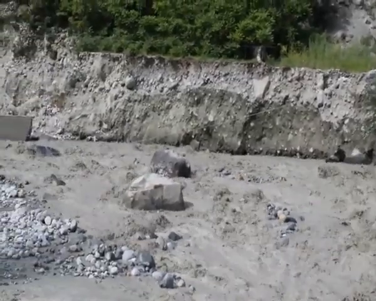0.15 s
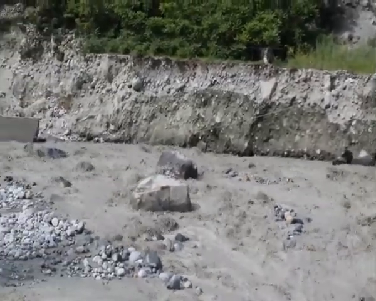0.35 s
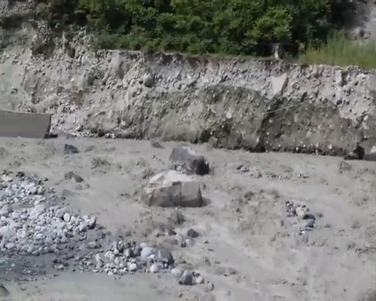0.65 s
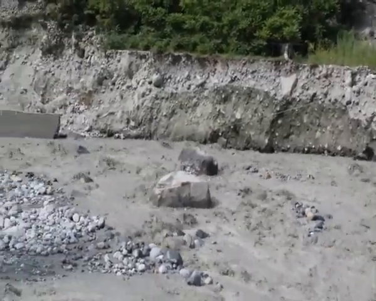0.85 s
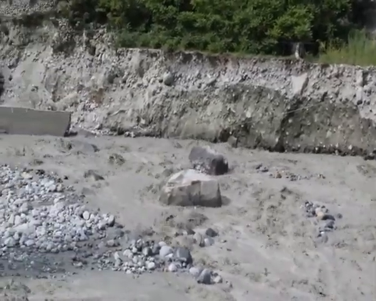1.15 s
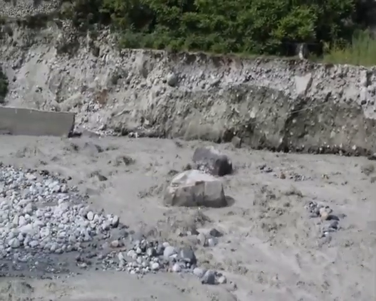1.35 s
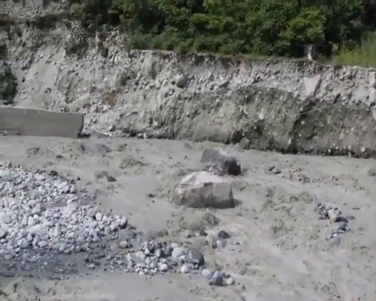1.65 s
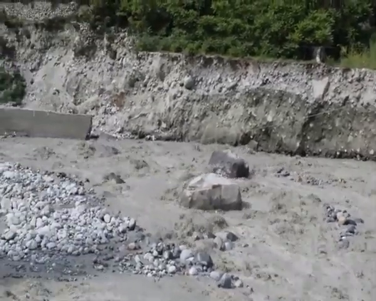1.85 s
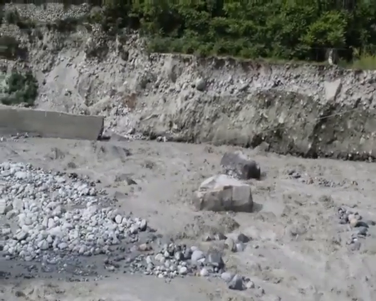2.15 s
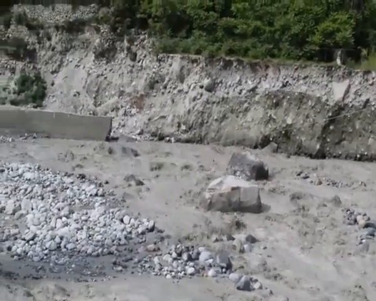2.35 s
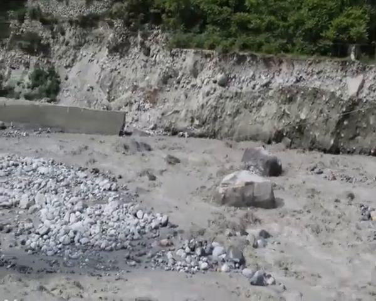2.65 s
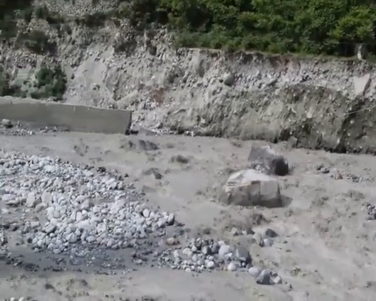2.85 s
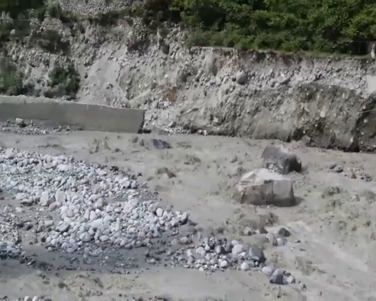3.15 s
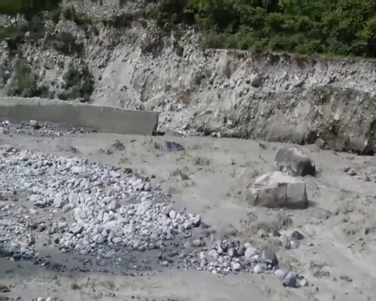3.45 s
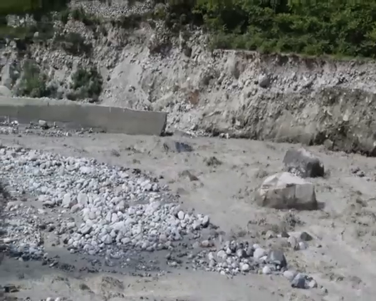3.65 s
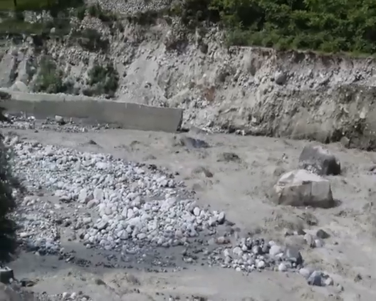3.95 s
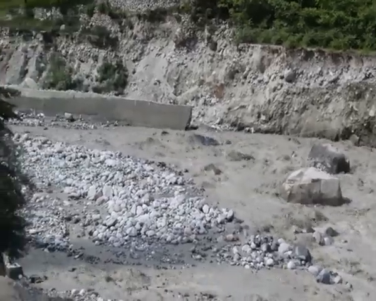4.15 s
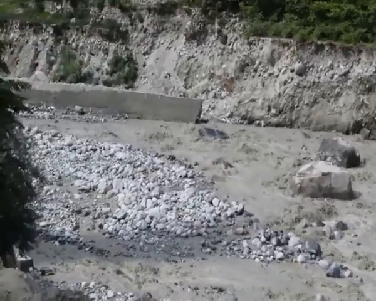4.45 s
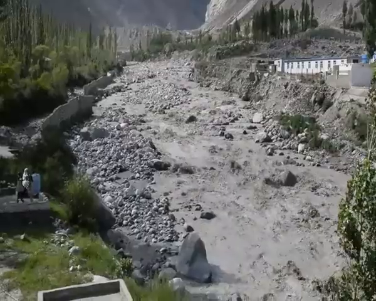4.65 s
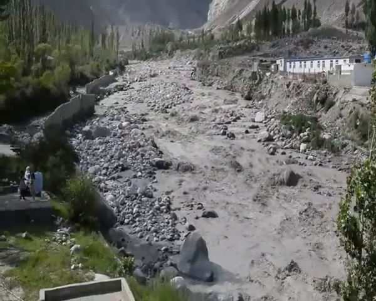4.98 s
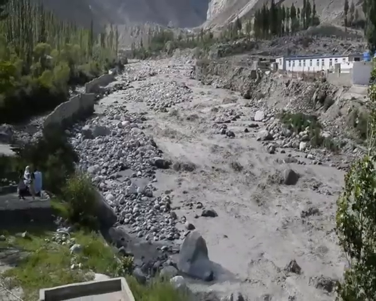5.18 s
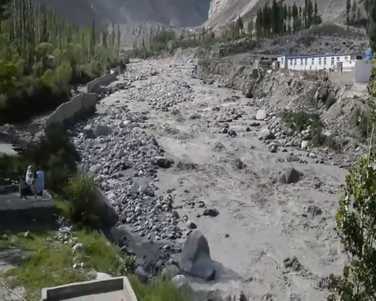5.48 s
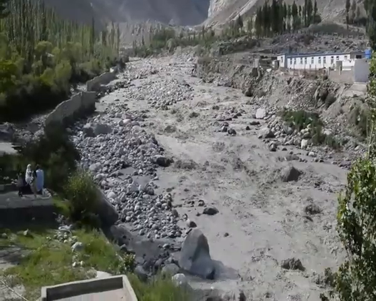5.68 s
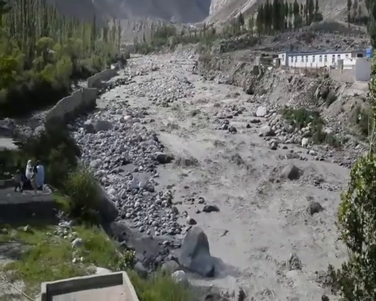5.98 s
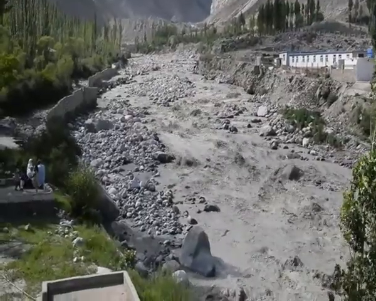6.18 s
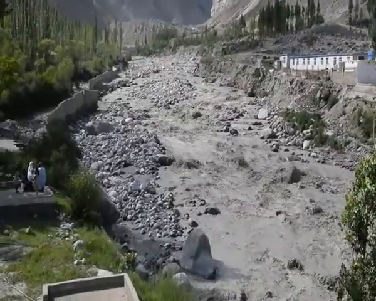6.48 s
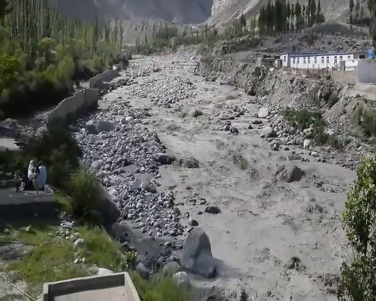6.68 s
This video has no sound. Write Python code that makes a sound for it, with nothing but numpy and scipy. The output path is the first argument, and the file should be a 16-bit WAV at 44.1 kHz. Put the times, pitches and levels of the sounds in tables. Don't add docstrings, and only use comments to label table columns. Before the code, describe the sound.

Close to a rocky torrent, broad water roar, low stony rumble and fine spray run continuously, with hollow fuzzy resonances between rocks and a faint whining engine drone that vanishes around three seconds. The roar gradually eases. A hard cut then drops to near silence; a softer, darker distant flow swells in, hit by clusters of loud, dull wind pops on a small stereo camera microphone.

```python
import sys
import numpy as np
from scipy import signal
from scipy.fft import rfft, irfft, next_fast_len
from scipy.io import wavfile
from scipy.ndimage import uniform_filter1d, map_coordinates

SR = 44100
rng = np.random.default_rng(int(sys.argv[2]) if len(sys.argv) > 2 else 0)


def dump_mix(stems):
    frames = np.atleast_2d(stems).T
    limited = np.clip(frames, -1, 1)
    pcm = np.round(limited * 32767).astype(np.int16)
    wavfile.write(sys.argv[1], SR, pcm)


def ratio(d):
    e = np.asarray(d, float) / 20
    return 10 ** e


N = 300762

# [t/s, roar level/dB, spray over roar/dB]
NEAR_FLOW = [
    (0, -18.5, -12.5),
    (.8, -18, -12),
    (1.5, -18, -11),
    (2.75, -19, -9),
    (3.5, -20.5, -8.5),
    (4.2, -21.5, -8.5),
    (4.57, -22, -9.5),
]
# [rumble level/dB, roar level/dB, spray level/dB]
FAR_FLOW = (-27, -26, -35)
# [level/dB, faced at t/s, 6 dB down after/s]
POCKETS = [
    (-23, 1.95, 1),
    (-18, 1.02, 1.7),
    (-23, 1.8, 2.1),
]
# [f/Hz, width/Hz, level/dB]
POCKET_MODES = [
    [(691, 90, 14), (1260, 90, -9)],
    [(836, 140, 1)],
    [(1814, 66, -4), (1976, 55, -5.5)],
]
# [shaft order/1, level/dB, loudest at t/s, 6 dB down after/s]
ENGINE_LINES = [
    (1, -41, 1.3, 1.2),
    (2, -33.5, 2.54, 1.3),
    (4, -29.5, .58, .22),
    (6.25, -27, 2.5, .4),
    (6.05, -29.5, 0.47, .5),
    (8.1, -31.5, 2.36, 1),
    (9, -28.5, 1.05, 0.44),
]
# [f/Hz, level/dB per Hz]
NEAR_COLOUR = [(25, -49), (105, -5), (150, -8), (290, -1), (434, -4), (682, -1), (1020, -2), (1780, -4),
               (3250, -15.5), (3900, -17), (5390, -21.5), (9140, -32), (13000, -51), (22000, -120)]
FAR_COLOUR = [(18, -74), (30, -50), (58, -19.5), (150, -8), (329, -2), (423, -7), (649, -5), (1190, -6.5),
              (2470, -13), (3300, -20), (6500, -32), (9500, -37.5), (13000, -54), (22000, -120)]
# [f/Hz, likeness/1]
NEAR_ALIKE = [(60, 0.99), (130, 0.99), (270, 0.99), (580, 0.98), (1230, 0.96), (2630, 0.92), (5600, 0.78),
              (11900, 0.19)]
FAR_ALIKE = [(60, 0.88), (500, 0.99), (1230, 1), (2630, 0.96), (5600, 0.89), (11900, 0.49)]
# [f/Hz, left minus right/dB]
PORT_LEAN = [(60, -1), (230, -0.5), (850, -1.0), (3180, -1.5), (11900, -2.5)]
# [f/Hz, level/dB per Hz]
BUFFET_COLOUR = [(25, -45), (60, -19), (150, 4.5), (290, -7), (500, -8.5), (820, -10), (1400, -17),
                 (3000, -57), (6000, -120)]
# [t/s, edge shift/Hz, half length/s]
TREBLE_SHIFTS = [(1.22, 800, .04), (2.55, 550, .65), (3.41, 1900, .035), (3.65, 1300, .11), (4.2, 700, .05),
                 (4.35, -900, .04), (4.45, 900, .03), (4.8, -4600, .03), (4.887, -4600, .03),
                 (5.49, -2700, .07), (5.6, -3900, .045), (6.05, -3800, .025), (6.7, -3400, .025),
                 (6.8, -3600, .045)]
# [t/s, peak level/dB, f/Hz, push 1 or suction -1]
LEFT_POPS = [(4.885, -3, 420, -1), (4.8922, 2, 390, 1), (4.9542, -5, 410, 1), (5.3857, -10, 510, 1),
             (5.4348, -1, 400, -1), (5.4386, 0, 570, -1), (5.4669, -11, 440, 1), (5.517, 0, 450, 1),
             (5.5383, -9, 540, 1), (5.5479, -6, 480, 1), (5.5689, -3, 380, 1), (5.6118, -6, 360, 1),
             (5.6221, -7, 370, 1), (5.6319, -6, 500, -1), (6.0537, -5, 420, 1), (6.698, -1, 570, -1),
             (6.7023, -2, 530, 1), (6.7434, -6, 500, -1), (6.7494, -8, 600, -1), (6.7716, -6, 480, -1),
             (6.7761, -4, 610, 1), (6.7799, -5, 550, -1), (6.7839, -5, 560, 1), (6.7891, 0, 400, 1),
             (6.8166, -9, 420, -1)]
RIGHT_POPS = [(4.746, -6, 400, 1), (4.8191, -3, 320, -1), (4.8833, -1, 270, 1), (4.9537, -6, 300, -1),
              (4.9645, -6, 450, 1), (5.0099, -7, 480, -1), (5.0553, -10, 320, -1), (5.1143, -8, 330, 1),
              (5.3948, -10, 430, 1), (5.437, -3, 400, -1), (5.4395, 3, 400, 1), (5.504, -5, 330, -1),
              (5.5139, -7, 480, 1), (5.5323, -8, 390, -1), (5.5427, -6, 310, 1), (5.5501, -6, 400, 1),
              (5.5551, -2, 550, -1), (5.5666, -1, 330, 1), (5.608, -2, 530, 1), (5.6199, -9, 450, 1),
              (5.7061, -9, 490, 1), (6.7004, 0, 600, 1), (6.7015, 3, 330, 1), (6.708, -5, 510, 1),
              (6.7887, -5, 550, -1), (6.7909, 3, 450, -1), (6.8167, -10, 510, -1)]

SCENE_CHANGE_S = 4.574
RUMBLE_TOP_HZ, ROAR_TOP_HZ = 450, 2600
NEAR_RUMBLE_DB, RUMBLE_FOLLOWS = -25.5, 0.32
FADE_S, FADE_POWER, FADE_FLOOR_DB = .44, 2.97, -30
POCKET_SHIMMER_DB = 3
FIRING_HZ, TOP_SPEED_S, SAG_HZ_PER_S2, ENGINE_GONE_S = 107.8, 1.9, 4.1, 3.13
BREEZE_DB, GUST_DB, GUST_S = -36, -27, .018
NEAR_EDGE_HZ, EDGE_HZ_PER_DB, FAR_EDGE_HZ = 10050, 151, 10800
EDGE_GRID_HZ = 32 * SR / 2048


def unit(x):
    return x / np.sqrt(np.mean(x ** 2) + 1e-20)


def along(points, hz):
    f, v = np.transpose(points)
    return np.interp(np.log(hz + 1), np.log(f + 1), v)


def curves(rows):
    s, *cols = np.transpose(rows)
    return [np.interp(np.arange(N) / SR, s, c) for c in cols]


def wobble(rate_hz):
    knots = rng.standard_normal(int(N * rate_hz / SR) + 4)
    return map_coordinates(knots, [np.arange(N) * rate_hz / SR])


def swell_db(peak_s, reach_s):
    return -6 * ((np.arange(N) / SR - peak_s) / reach_s) ** 2


def filtered(x, response):
    m = next_fast_len(N + 8192)
    return irfft(rfft(x, m) * response(np.fft.rfftfreq(m, 1 / SR)), m)[..., :N]


def below(hz, edge_hz):
    return 1 / np.sqrt(1 + (hz / edge_hz) ** 6)


def above(hz, edge_hz):
    return np.sqrt(1 - below(hz, edge_hz) ** 2)


def rush(gain, alike, patchy_db, lag_s=-13e-6):
    z = signal.stft(rng.standard_normal((2, N)), nperseg=512)[2]
    field = uniform_filter1d(rng.standard_normal(z.shape[1:]), size=6, axis=0)
    field = uniform_filter1d(field, size=10, axis=1)
    pair = signal.istft(z * ratio(patchy_db * unit(field)), nperseg=512)[1][:, :N]
    turn = lambda hz: np.arccos(np.clip(along(alike, hz), -1, 1)) / 2
    mid, side = filtered(pair, lambda hz: gain(hz) * [np.cos(turn(hz)), np.sin(turn(hz))])
    ports = np.array([[1], [-1]])
    lean = lambda hz: ratio(ports * along(PORT_LEAN, hz) / 2)
    delay = lambda hz: np.exp(1j * np.pi * ports * hz * lag_s)
    return unit(filtered(np.array([mid + side, mid - side]), lambda hz: lean(hz) * delay(hz)))


def torrent(rumble_db, roar_db, spray_db, colour, alike, bubble_db):
    tint = lambda hz: ratio(along(colour, hz))
    surge_db = .5 * wobble(5.016) + 0.12 * wobble(12)
    rumble = rush(lambda hz: tint(hz) * below(hz, RUMBLE_TOP_HZ), alike, patchy_db=-0.5)
    roar = rush(lambda hz: tint(hz) * above(hz, RUMBLE_TOP_HZ) * below(hz, ROAR_TOP_HZ),
                alike, patchy_db=-0.9)
    roar = roar + ratio(bubble_db) * bubbles(centre_hz=907.6, cycles=7.94, spread_db=2.5, count=4000)
    spray = rush(lambda hz: tint(hz) * above(hz, ROAR_TOP_HZ), alike, patchy_db=0.67)
    rolling = ratio(rumble_db + 1.23 + 0.88 * wobble(8))
    water = rolling * rumble + ratio(roar_db + 3.0) * roar + ratio(spray_db + 2.5) * spray
    return ratio(surge_db) * water


def bubbles(centre_hz, cycles, spread_db, count):
    start_frac, size, big = rng.random(count), rng.standard_normal(count), rng.exponential(size=count)
    hz = np.clip(centre_hz * np.exp(.5 * size), 350, 6000)[:, None]
    t = np.arange(700) / SR
    u = t * hz / cycles
    level = ratio(spread_db * np.minimum(big, 3.5))[:, None]
    tone = np.sin(2 * np.pi * hz * t * (1 + .12 * u))
    grains = level * u * np.exp(-3 * u) * tone
    at = (start_frac * N).astype(int)[:, None] + np.arange(len(t))
    return unit(np.bincount(at.ravel(), grains.ravel())[:N])


def pockets():
    total = 0
    for (level_db, faced_s, reach_s), modes in zip(POCKETS, POCKET_MODES):
        ring = lambda f: sum(ratio(db) * np.abs(f * w / (c * c - f * f + 1j * f * w)) ** 1.94
                             for c, w, db in modes)
        shimmer_db = POCKET_SHIMMER_DB * wobble(3.96) + 0.44 * wobble(9.2)
        gain = ratio(level_db - 4.5 + swell_db(faced_s, reach_s) + shimmer_db)
        total = total + gain * rush(ring, NEAR_ALIKE, patchy_db=0.5)
    return total


def wind():
    lumps = ratio(5 * np.array([wobble(40), wobble(40)]) + 2.5 * wobble(25))
    air = filtered(rng.standard_normal((2, N)), lambda hz: ratio(along(BUFFET_COLOUR, hz)))
    gusts = ratio(2 * GUST_DB - 5) * turbulence(LEFT_POPS + RIGHT_POPS, GUST_S)
    strength = np.sqrt(ratio(2 * BREEZE_DB) + gusts)
    return strength * unit(lumps * air) + np.array([pops(LEFT_POPS), pops(RIGHT_POPS)])


def pops(rows, low_cut_hz=90):
    out, t = np.zeros(N + SR), np.arange(-600, 600) / SR
    for (s, db, hz, sign), skew in zip(rows, rng.standard_normal((len(rows), 1))):
        envelope = np.exp(-np.abs(1.7 * hz * t) ** 1.8)
        push = np.cos(2 * np.pi * hz * t + .3 * skew) * envelope
        out[round(s * SR) - len(t) // 2:][:len(t)] += sign * ratio(db + .5) * push
    return signal.sosfilt(signal.butter(2, low_cut_hz, "high", fs=SR, output="sos"), out[:N])


def turbulence(rows, spread_s):
    s, db = np.transpose(rows)[:2, :, None]
    t = np.arange(0, N, 128) / SR
    power = np.sum(ratio(2 * db) * np.exp(-((t - s) / spread_s) ** 2), axis=0)
    return np.interp(np.arange(N) / SR, t, power)


def engine():
    t = np.arange(N) / SR
    shaft_hz = FIRING_HZ - SAG_HZ_PER_S2 * (t - TOP_SPEED_S) ** 2
    phase = 2 * np.pi * np.cumsum(shaft_hz) / SR + .4 * wobble(10)
    lines = [ratio(db + swell_db(s, reach_s) + 1.7 * wobble(12)) * np.sin(order * phase)
             for order, db, s, reach_s in ENGINE_LINES]
    bend = np.clip((ENGINE_GONE_S - t) / 0.29, 0, 1)
    return np.sqrt(2) * sum(lines) * bend * ratio([[-.4], [.4]])


def scene():
    since_s = np.arange(N) / SR - SCENE_CHANGE_S
    after = since_s > 0
    smear = ratio(-36 - 60 * np.abs(since_s) / 0.043) * after
    near_gain = np.clip(-since_s / 0.0023, 0, 1) + smear
    recovery = np.clip(since_s / FADE_S, 0, 1) ** FADE_POWER
    far_gain = np.minimum(ratio(FADE_FLOOR_DB) + recovery, 1) * after
    roar_db, spray_db = curves(NEAR_FLOW)
    rumble_db = NEAR_RUMBLE_DB + RUMBLE_FOLLOWS * (roar_db - roar_db.mean())
    near = torrent(rumble_db - 1, roar_db, roar_db + spray_db, NEAR_COLOUR, NEAR_ALIKE, bubble_db=-10.5)
    near = near + pockets() + engine()
    far = torrent(*FAR_FLOW, FAR_COLOUR, FAR_ALIKE, bubble_db=-7.0) + wind()
    return near_gain * near + far_gain * far


def treble_edge(t):
    s, _, spray_db = np.transpose(NEAR_FLOW)
    near_hz = NEAR_EDGE_HZ + EDGE_HZ_PER_DB * (np.interp(t, s, spray_db) - spray_db.min())
    shift_hz = sum(hz * np.exp(-((t - at) / half_s) ** 4) for at, hz, half_s in TREBLE_SHIFTS)
    return np.where(t < SCENE_CHANGE_S, near_hz, FAR_EDGE_HZ) + shift_hz


def thin_treble(x, ragged_hz, hole_share):
    hz, t, z = signal.stft(x, SR, "cosine", nperseg=2048)
    edge = treble_edge(t) + ragged_hz * rng.standard_normal(len(t))
    edge = (np.round(edge / EDGE_GRID_HZ - 1 / 3) + 1 / 3) * EDGE_GRID_HZ
    thin = uniform_filter1d(rng.standard_normal(z.shape[1:]), size=4, axis=0) * 2
    kept = thin < 1 / (hole_share * (hz[:, None] / edge) ** 2 + 1e-3)
    return signal.istft(z * (hz[:, None] < edge) * kept, SR, "cosine", nperseg=2048)[1][:, :N]


def band_limit(x):
    return signal.sosfilt(signal.butter(12, 12520, fs=SR, output="sos"), x)


def record(dry):
    soft = dry / (1 + np.abs(dry) ** 24) ** (1 / 24)
    mix = thin_treble(soft, ragged_hz=330, hole_share=1.5)
    return band_limit(mix)


dry = scene()
out = record(dry)
dump_mix(out)
```